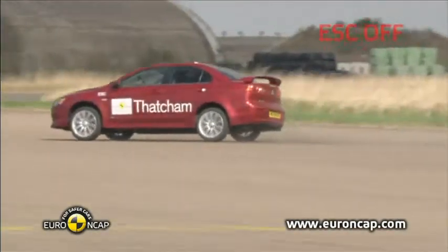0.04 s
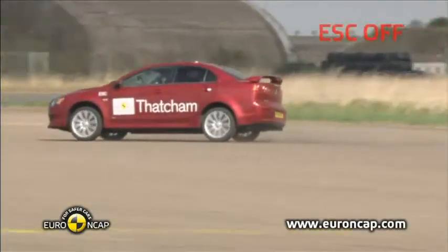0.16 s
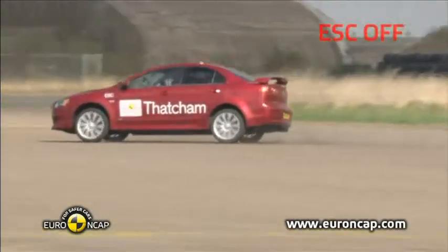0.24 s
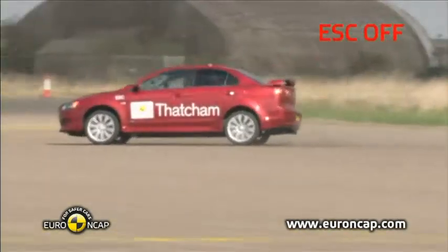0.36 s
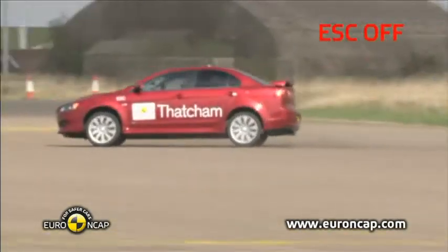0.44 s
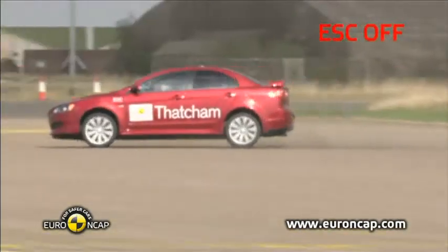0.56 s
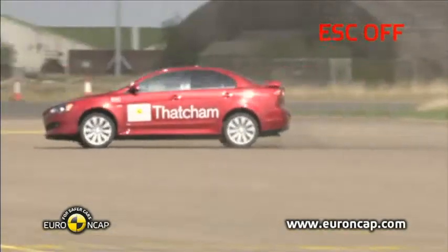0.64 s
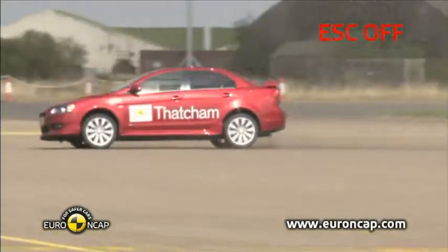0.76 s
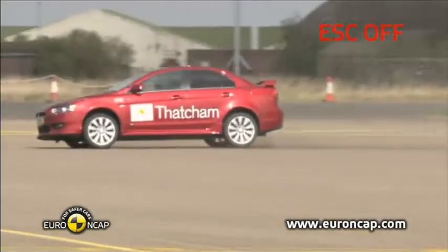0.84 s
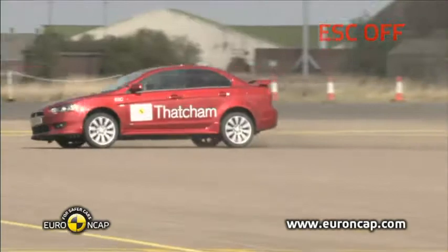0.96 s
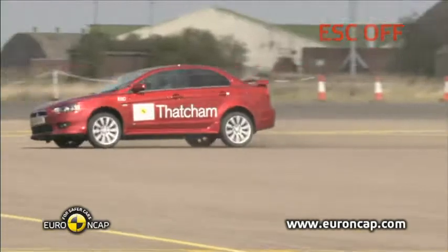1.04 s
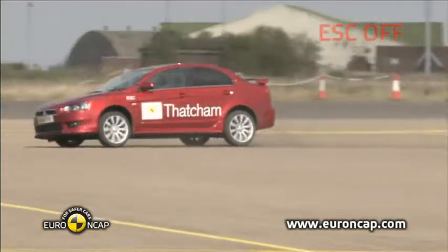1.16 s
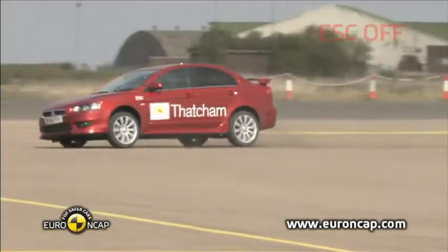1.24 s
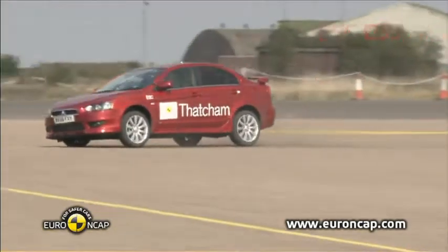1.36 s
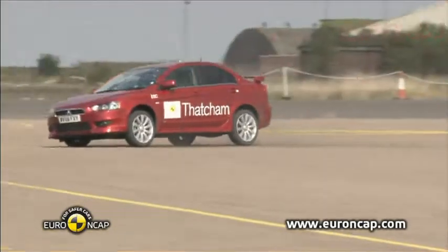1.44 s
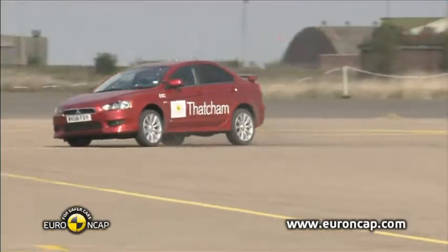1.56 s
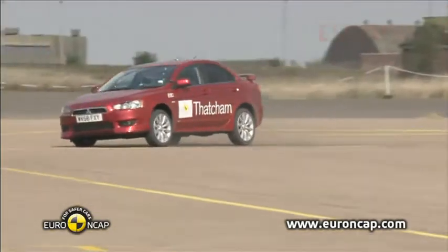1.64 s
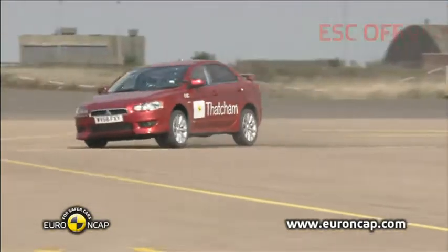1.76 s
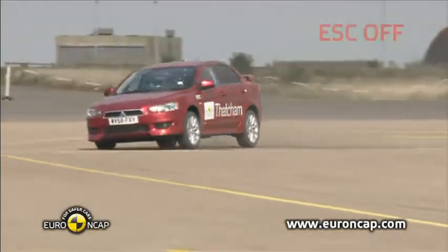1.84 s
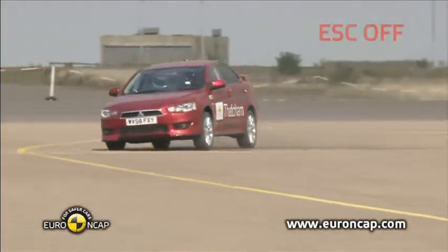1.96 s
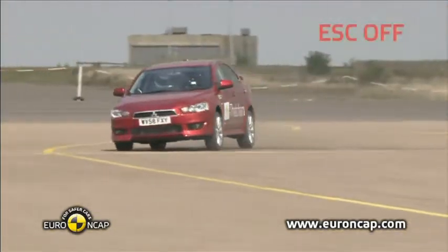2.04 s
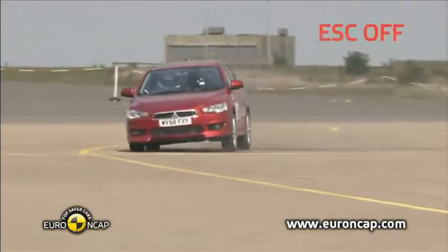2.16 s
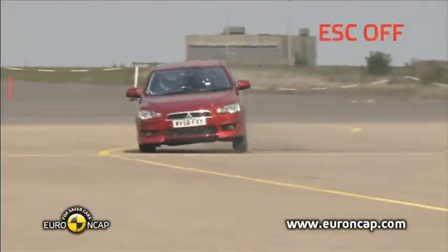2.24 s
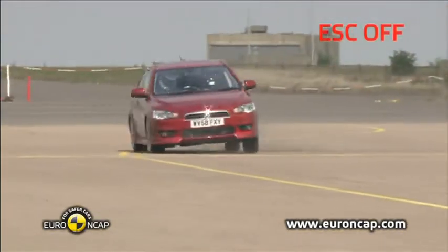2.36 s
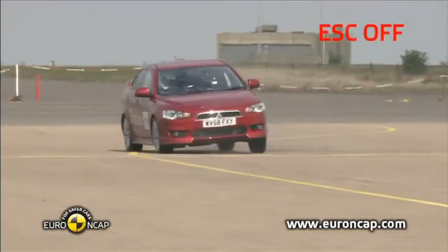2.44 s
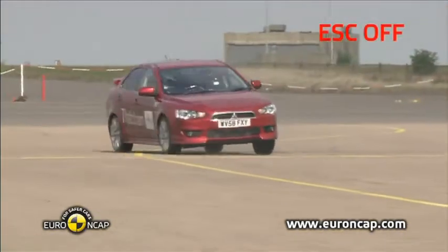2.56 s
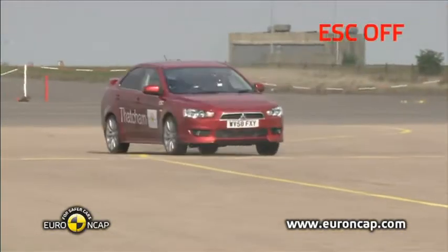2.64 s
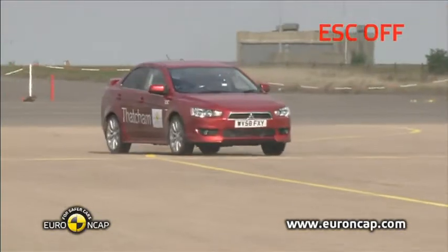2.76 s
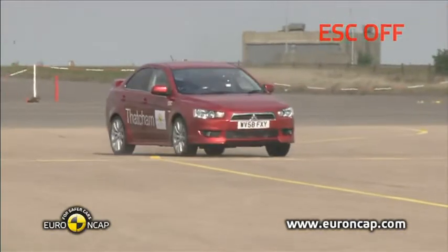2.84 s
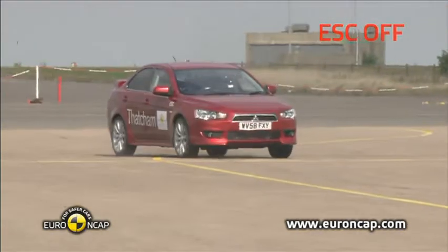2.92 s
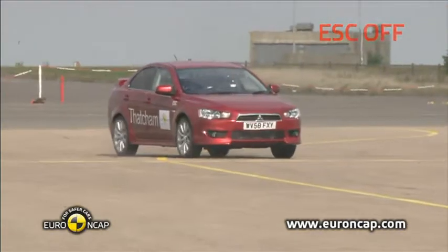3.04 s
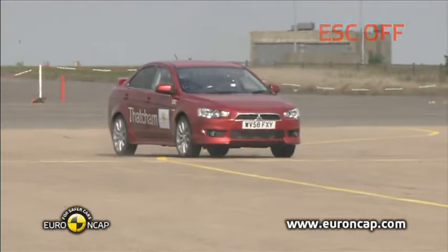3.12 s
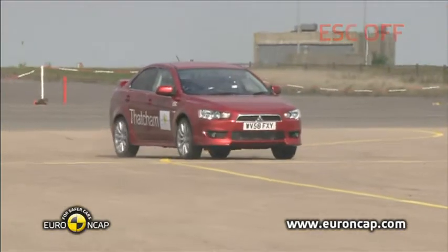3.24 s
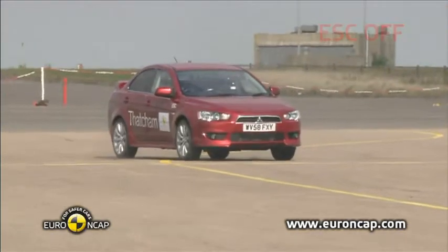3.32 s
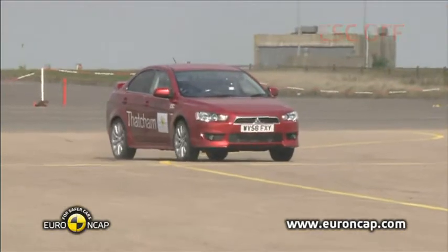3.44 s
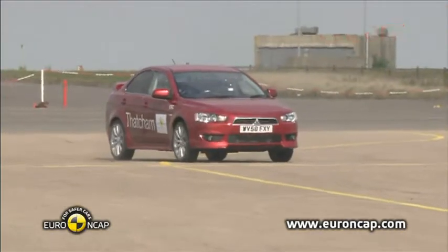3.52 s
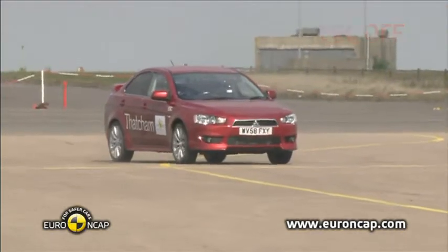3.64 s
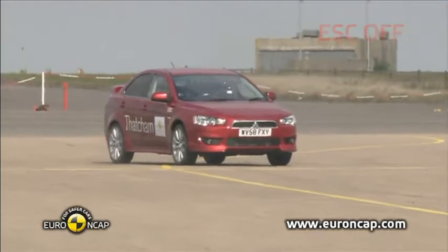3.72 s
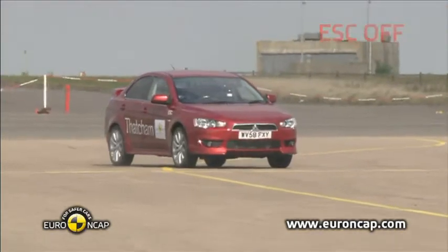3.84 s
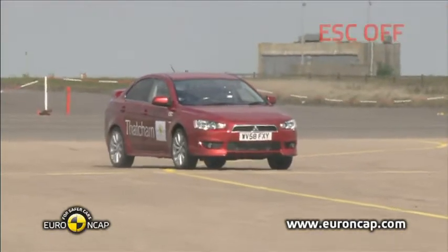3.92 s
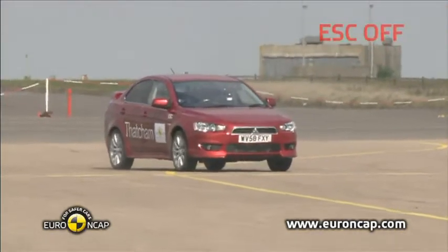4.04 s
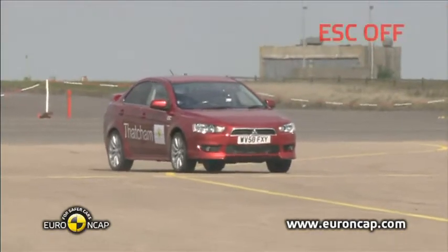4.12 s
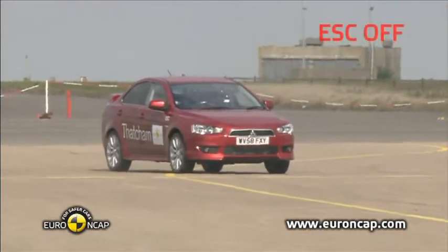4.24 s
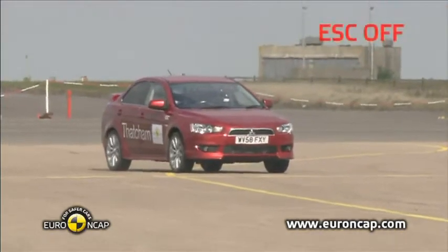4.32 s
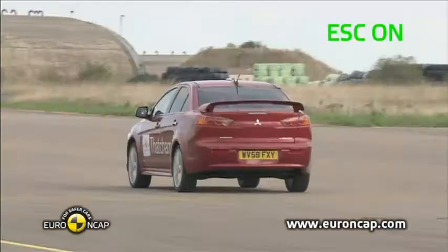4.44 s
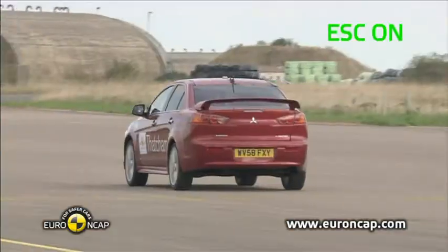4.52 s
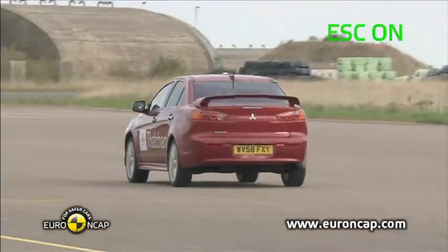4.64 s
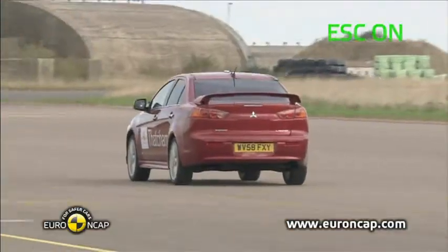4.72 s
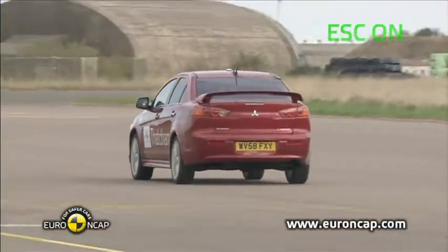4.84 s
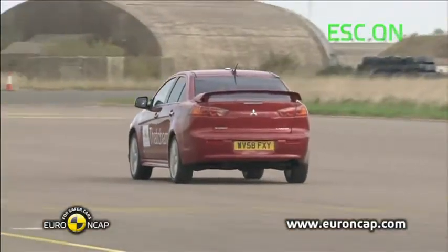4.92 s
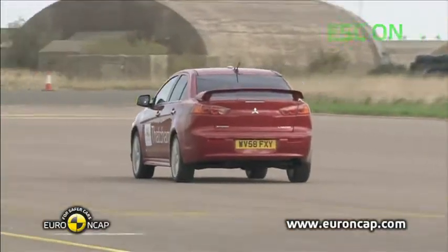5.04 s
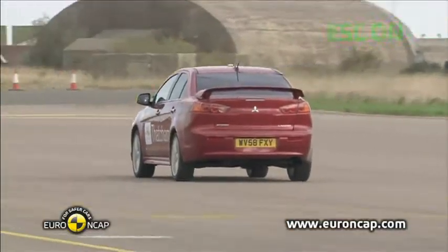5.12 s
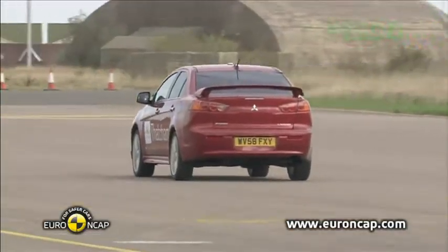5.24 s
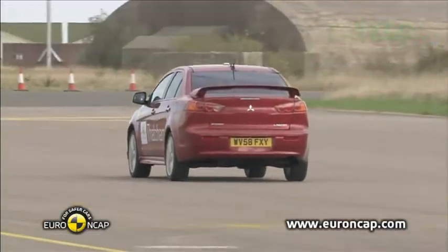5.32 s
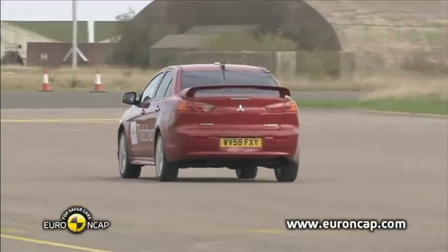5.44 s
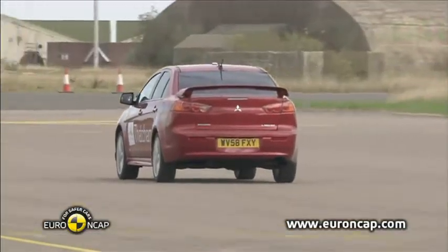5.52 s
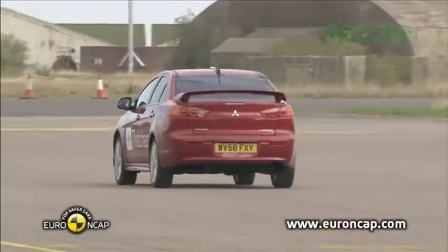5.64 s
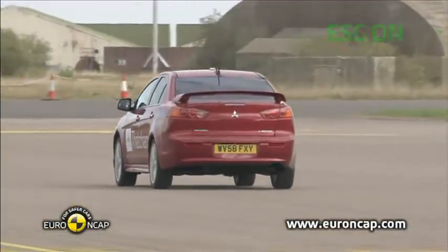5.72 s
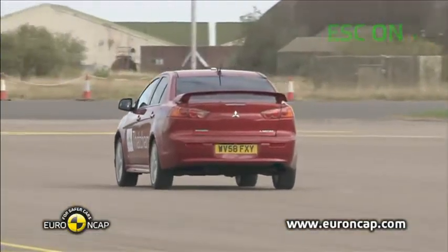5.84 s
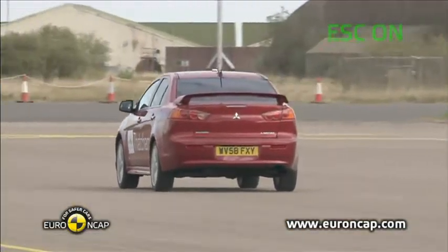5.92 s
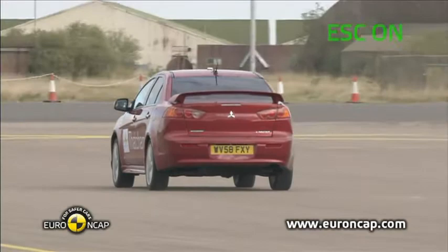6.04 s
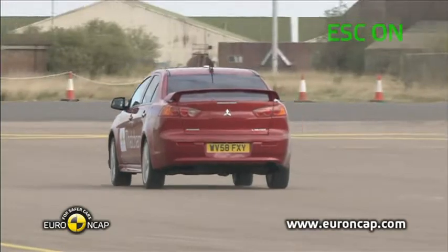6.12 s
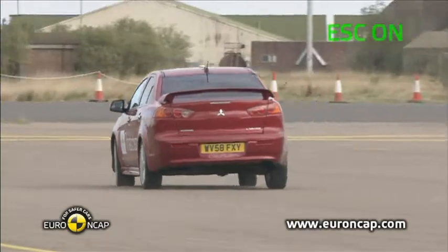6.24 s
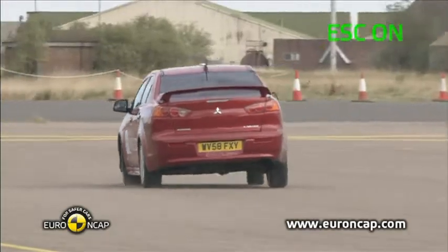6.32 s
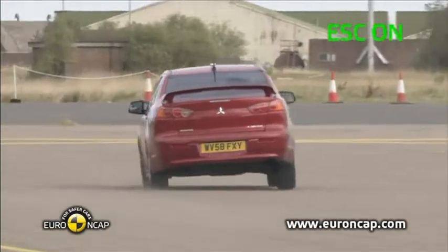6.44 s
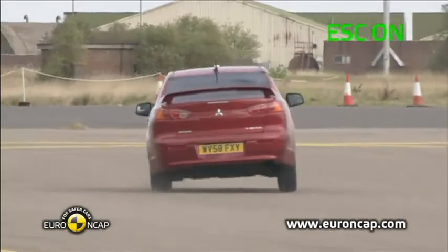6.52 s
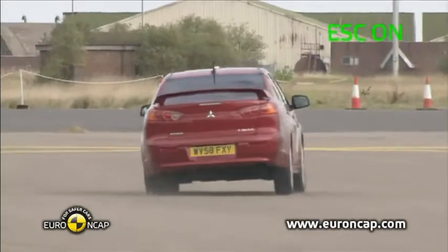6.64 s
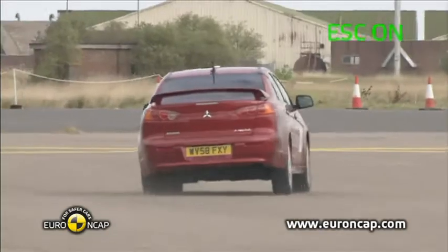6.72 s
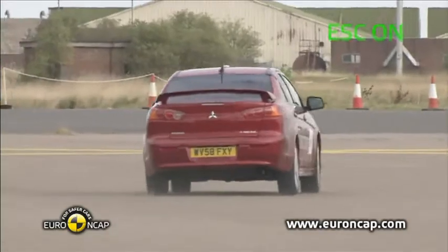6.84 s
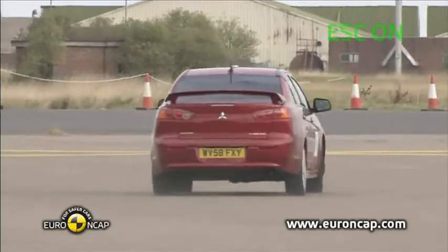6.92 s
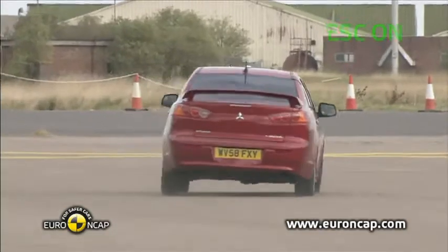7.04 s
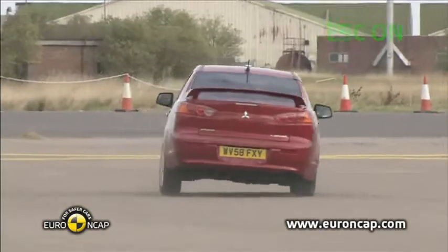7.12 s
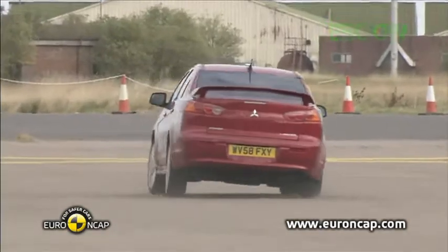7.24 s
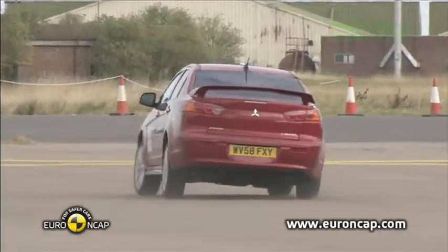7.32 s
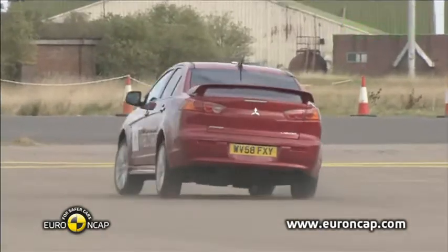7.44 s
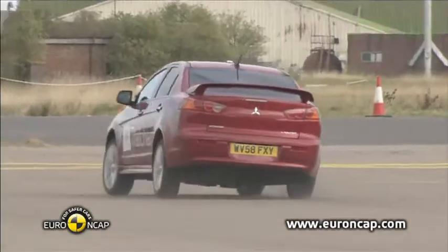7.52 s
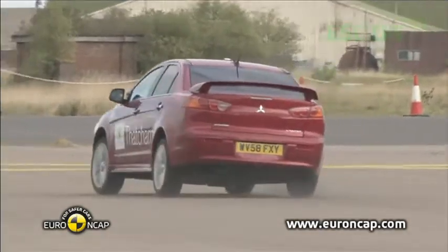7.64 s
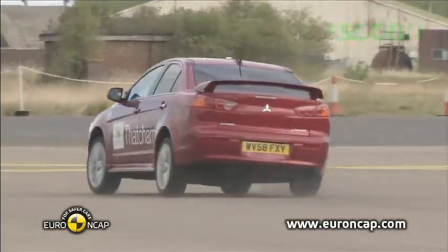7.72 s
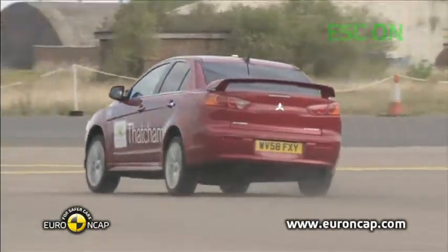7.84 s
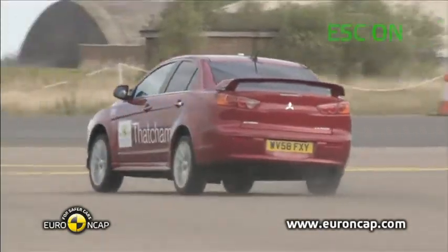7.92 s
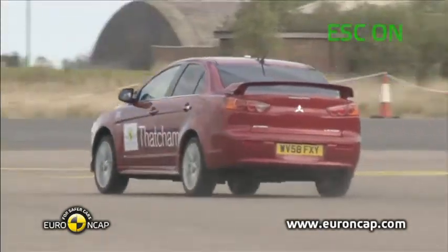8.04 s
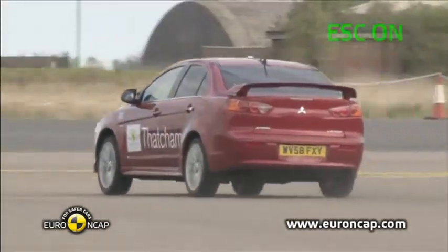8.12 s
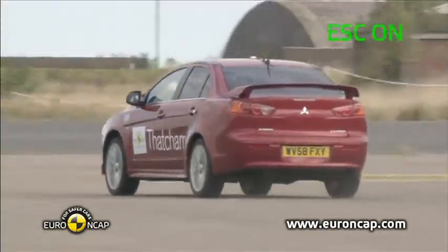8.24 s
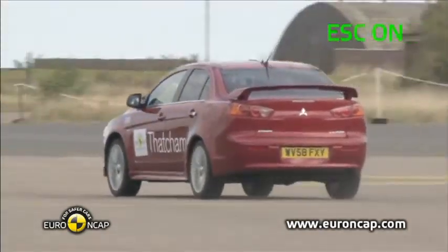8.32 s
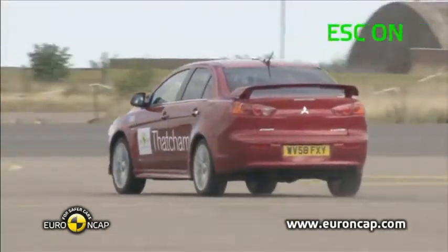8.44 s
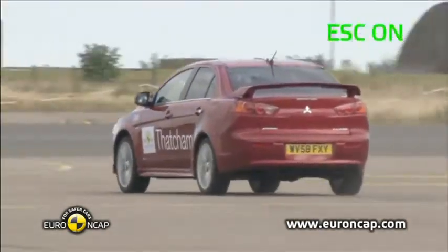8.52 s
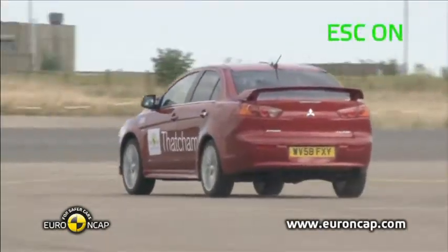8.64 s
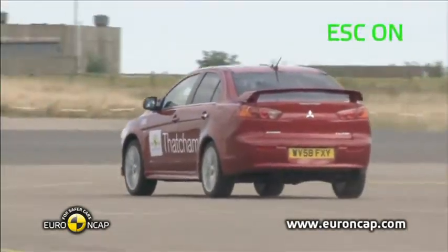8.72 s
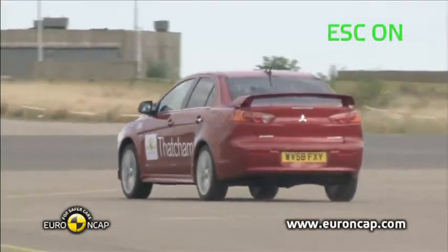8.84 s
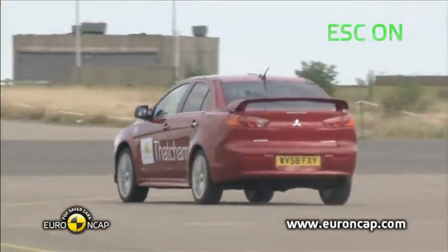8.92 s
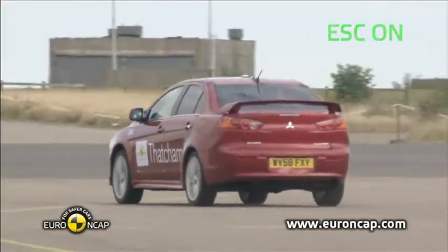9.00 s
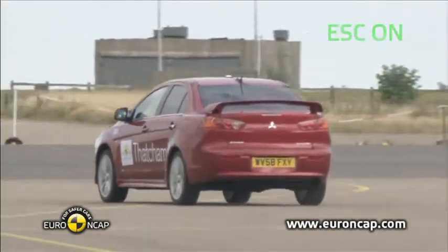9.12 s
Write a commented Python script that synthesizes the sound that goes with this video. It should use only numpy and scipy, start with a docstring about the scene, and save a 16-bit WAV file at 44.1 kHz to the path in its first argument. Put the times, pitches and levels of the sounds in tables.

```python
"""Tyres squeal as a car skids sideways to a stop on open asphalt. After an abrupt change of scene it
drives away, swerves, and one tyre squeals briefly. The squeal is a stick-slip oscillation of the tread;
scrubbing and rolling add a broad roar above the rumble of engine and body. Wind buffets the two ports
of the microphone, with a few small rustles nearby, over far traffic and a faint hiss."""
import sys
import numpy as np
from scipy import signal
from scipy.fft import rfft, irfft, next_fast_len
from scipy.io import wavfile

SR = 44100
rng = np.random.default_rng(int(sys.argv[2]) if len(sys.argv) > 2 else 0)


def transcribe(u):
    """Save the signal u as a 16-bit wav file named by the first command-line argument.

    u: samples, shape (n,) or (channels, n), limited to [-1, 1]; the rate is SR.
    q: integer samples, one column per channel.
    """
    v = np.clip(np.atleast_2d(u).T, -1, 1)
    q = np.round(v * 32767).astype(np.int16)
    wavfile.write(sys.argv[1], SR, q)


N = 404397


def squeal(rows, wander, flutter_db, skirt_db, third_db, skirt_hz=41.0, rougher_db=4.5):
    """Stick-slip oscillation: tread blocks slipping in step give four wavering harmonics, and those
    out of step give each a skirt of noise, rougher_db stronger from one harmonic to the next."""
    start, end = round(rows[0][0] * SR), round(rows[-1][0] * SR)
    size = end - start
    slip_hz, first_db, second_db = (column[start:end] for column in in_time(rows))
    upper_db = second_db + np.broadcast_to(third_db, N)[start:end]   # third_db is relative to the 2nd
    levels_db = first_db, second_db, upper_db, upper_db - 13.5
    t = np.arange(size) / SR
    gate = np.clip(np.minimum(t / .004, t[::-1] / .03), 0, 1)
    waver = 1 + wander * (drift(14, size) + .7 * drift(50, size))
    phase = 2 * np.pi * np.cumsum(slip_hz * waver) / SR
    partials = 0
    for k, level_db in enumerate(levels_db):
        width_hz = skirt_hz * (k + 1)
        skirt = from_db(skirt_db + rougher_db * k) * (drift(width_hz, size) + 1j * drift(width_hz, size))
        swing = np.minimum(drift(22, size), 1.1)   # dips deeper than it swells
        flutter = from_db(flutter_db * (1 + .15 * k) * swing)
        harmonic = np.real(np.exp(1j * (k + 1) * phase) * (1 + skirt))
        partials += from_db(level_db) * flutter * harmonic
    out = np.zeros(N)
    out[start:end] = np.sqrt(2) * gate * partials
    return out


def tyres():
    """Superposition: each sliding tyre oscillates at its own slip frequency, and the squeals add."""
    # Squeals. Each row: time in seconds, slip frequency in Hz, 1st and 2nd harmonic levels in dB.
    outer_front = [(0.0, 749, -22, -17), (0.2, 740.5, -21, -19), (0.42, 738, -17, -23),
                   (0.55, 720.9, -23, -32.5), (0.66, 743.8, -20, -29.5), (1.0, 732.8, -23, -35.5),
                   (1.32, 711, -35, -37.5), (1.62, 699, -18.5, -32.5), (1.86, 722.8, -31.5, -32),
                   (2.06, 702.2, -26, -39), (2.16, 759.7, -26, -30.5), (2.48, 779.3, -27, -28),
                   (2.62, 767, -39, -35), (2.74, 792, -30, -38), (2.875, 802, -28, -39.5),
                   (2.9, 902, -24.5, -39.5), (2.94, 886, -38, -41.5), (2.965, 820, -27, -39),
                   (3.04, 876, -29, -37), (3.12, 888, -33, -50.5), (3.18, 950, -49, -63)]
    outer_rear = [(0.15, 860.7, -34.5, -42), (0.5, 853.2, -33, -34.5), (0.7, 827.2, -29, -41.5),
                  (0.92, 855, -27, -35.5), (1.14, 844.8, -29, -41.5), (1.25, 822.4, -30, -35),
                  (1.55, 855.4, -23.5, -32.5), (1.76, 934, -28, -43), (1.86, 949, -43, -58),
                  (1.96, 954, -30, -50.5), (2.14, 850, -31.5, -35), (2.4, 929, -27, -44),
                  (2.52, 926, -31.5, -43.5), (2.76, 1035, -47, -58.5)]
    inner_front = [
        [(0.28, 773, -30.5, -28.5), (0.42, 817, -36.5, -26.5), (0.55, 778, -33.5, -19.5),
         (0.65, 801, -39.5, -25), (0.76, 790, -56, -56.5)],
        [(1.0, 757, -48, -57.5), (1.06, 738, -31, -38.5), (1.23, 750.5, -38.5, -31), (1.38, 727, -38.5, -34.5),
         (1.66, 745, -25.5, -31), (1.86, 730.5, -28.5, -41), (2.04, 749.7, -30.5, -25.5), (2.13, 762, -43, -24)],
    ]   # two slides, a table for each
    swerve = [(7.52, 727, -43, -63), (7.62, 712, -30.5, -44), (7.71, 735.7, -24.5, -44),
              (7.76, 702.2, -18, -41.5), (7.94, 704, -22.5, -39), (8.03, 723.5, -23.5, -33.5),
              (8.18, 737, -24.5, -48), (8.26, 795.5, -32.5, -51.5), (8.33, 770, -48.5, -50.5)]
    moan = [(6.66, 758, -56.5, -76), (6.76, 800, -49.5, -65), (6.88, 840, -54.5, -76),
            (7.1, 1079, -50, -88), (7.3, 952, -56.5, -83), (7.4, 830, -49, -72), (7.6, 880, -58, -69.5),
            (8.1, 940, -51.5, -55), (8.55, 864, -59, -78.5)]   # rough tone of tread on the edge of slipping
    linger = [(3.2, 772, -69, -96.5), (3.578, 765, -62, -86), (3.88, 782, -76, -96)]   # faint thin tone after the stop
    # Outer front tyre's 3rd harmonic. Each row: time in seconds, level against the 2nd in dB.
    front_third = [(0.0, -18), (0.3, -16.5), (0.55, -3), (0.95, -7.5), (1.1, -15.5), (1.4, -8.5), (1.6, -9),
                   (1.85, -26), (2.1, -20.5), (2.5, -9.5), (2.66, -16), (3.0, -22.5), (3.15, -24)]
    # The same ratio in dB for the outer rear, the two inner front slides, the swerve and the moan.
    other_thirds = [-19.5, -14, -21.5, -36, -12.5]
    rear_db, *inner_db, swerve_db, moan_db = other_thirds
    front_db = in_time(front_third)[0]
    out = squeal(outer_front, wander=.005, flutter_db=2.5, skirt_db=-16, third_db=front_db)
    out += squeal(outer_rear, wander=.011, flutter_db=4.2, skirt_db=-14, third_db=rear_db, rougher_db=7)
    for slide, slide_db in zip(inner_front, inner_db):
        out += squeal(slide, wander=.007, flutter_db=3.8, skirt_db=-13, third_db=slide_db)
    out += squeal(swerve, wander=.006, flutter_db=2.8, skirt_db=-13, third_db=swerve_db,
                  skirt_hz=90, rougher_db=17)
    out += squeal(moan, wander=.01, flutter_db=1.5, skirt_db=10, third_db=moan_db,
                  skirt_hz=130, rougher_db=0)
    return out + squeal(linger, wander=.004, flutter_db=3, skirt_db=-10, third_db=-20)


def road(change_s=4.46):
    """Random excitation: tread scrubs and rolls on rough asphalt, while engine and body rumble below."""
    # Skid and drive-away. Each row: time in seconds, then roar, treble and rumble levels in dB.
    skid = [(0.03, -36.5, -51, -48), (0.55, -36.5, -47.5, -51.5), (1.09, -37.5, -59, -49.5),
            (1.42, -37.5, -50.5, -52.5), (1.65, -33, -50, -48.5), (1.93, -36, -59, -51),
            (2.24, -38, -50, -54.5), (2.55, -43, -53, -56), (2.96, -50, -71, -60.5),
            (3.22, -69, -89, -64.5), (3.75, -79.5, -83, -86)]
    drive = [(4.55, -39.5, -56.5, -42), (4.75, -39.5, -58.5, -46), (5.96, -42, -64, -45.5),
             (6.35, -46, -68, -48), (6.55, -43.5, -63, -47.5), (6.8, -40.5, -60, -46),
             (7.0, -39.5, -63, -47.5), (7.16, -38, -55, -46), (7.37, -40.5, -64, -43.5),
             (7.56, -34, -52.5, -44.5), (8.13, -29, -46, -45.5), (8.31, -39.5, -53, -46.5),
             (8.45, -46, -63.5, -50), (8.66, -52.5, -77, -50), (9.0, -50.5, -72, -54.5),
             (9.17, -53.5, -71.5, -48)]
    # Spectra of the tread and the rumble. Each row: frequency in Hz, relative density in dB.
    skid_spectrum = [(300, -36), (500, -20.5), (700, -6.5), (870, -0.5), (1180, -8.5), (1500, -4.5),
                     (1900, -12), (2600, -24.5), (3400, -32.5), (4500, -47.5)]
    drive_spectrum = [(260, -31), (450, -9), (724, 0), (855, 4), (1160, 1), (1300, 1), (1750, -5.5),
                      (1970, -6.5), (2230, -11.5), (3300, -27), (4290, -55.5), (7260, -120)]
    treble_spectrum = [(2000, -5), (3000, 0), (3600, -2.5), (4500, -9), (5500, -16.5), (6300, -19.5),
                       (7200, -32), (8500, -34), (11000, -46)]
    rumble_spectrum = [(59, -40), (100, -6.5), (199, 0.5), (329, -3), (431, -1.5), (524, -7), (600, -3),
                       (780, -32.5), (1320, -120)]
    away = np.clip((np.arange(N) / SR - change_s) / .002, 0, 1)   # 0 in the first scene, 1 in the second
    roar_db, treble_db, rumble_db = away * in_time(drive) + (1 - away) * in_time(skid)
    roar = away * coloured(drive_spectrum, 966, 1426) + (1 - away) * coloured(skid_spectrum, 983, 1350)
    grit = from_db(0.47 * drift(10) + 0.77 * drift(55))   # uneven asphalt
    treble = from_db(treble_db + 0.72 * drift(14)) * coloured(treble_spectrum, 2800, 7100)
    rumble = from_db(rumble_db + 1.8 * drift(8)) * coloured(rumble_spectrum, 120, 650)
    return grit * (from_db(roar_db) * roar + treble) + rumble


def wind(opposed_share=.62, buffet_ramp_s=.045):
    """Turbulent pressure: part of it pushes one port while pulling the other, the rest is independent."""
    # Slow course of the wind. Each row: time in seconds, level in dB.
    course = [(0.0, -54.5), (0.27, -61), (0.45, -44.5), (1.4, -41.5), (1.55, -48), (1.9, -46.5),
              (2.35, -52.5), (2.7, -49), (3.3, -43.5), (5.6, -50), (6.15, -45.5), (6.6, -42), (7.25, -51.5),
              (8.3, -52), (9.17, -45.5)]
    # Buffets. Each row: time of the peak in seconds, rise above the slow course in dB.
    buffets = [(1.43, 5.6), (2.82, 8.5), (2.96, 15), (3.109, 6.4), (7.34, 6.8), (9.07, 7.3)]
    # Pressure spectrum. Each row: frequency in Hz, relative density in dB.
    spectrum = [(2, -12), (5, -1), (15, 1), (38, -1), (75, -5), (119, -13), (300, -24), (500, -36),
                (900, -70)]
    exposure_db = [[0], [5]]   # the right port is more exposed
    common, *own = (coloured(spectrum, 10, 90) for _ in range(3))
    pressure = np.sqrt(opposed_share) * common * [[1], [-1]] + np.sqrt(1 - opposed_share) * np.array(own)
    t = np.arange(N) / SR
    buffets_db = sum(db * np.clip(1 - abs(t - peak_s) / buffet_ramp_s, 0, 1) for peak_s, db in buffets)
    return from_db(in_time(course)[0] + buffets_db + exposure_db + 1.8 * drift(4.5)) * pressure


def rustle(resonance_hz=3230, body_hz=547, t60_s=0.096):
    """Noise-driven resonance: soft decaying puffs in a main band, its weaker octave and a dull body."""
    # Rustles near the microphone. Each row: start in seconds, relative level in dB.
    puffs = [(3.8536, -75), (3.874, -61), (3.891, -57), (3.905, -54.5), (3.9294, -59), (3.9524, -64),
             (3.99, -69), (4.324, -68), (4.3494, -67)]
    bands = [signal.butter(2, [hz * 0.7, hz * 1.15], "band", fs=SR, output="sos")
             for hz in (resonance_hz, 2 * resonance_hz, body_hz)]
    out, t = np.zeros(N), np.arange(4000) / SR
    for start_s, level_db in puffs:
        noise = rng.standard_normal(len(t))
        main, octave, body = (rms_one(signal.sosfilt(band, noise)) for band in bands)
        envelope = from_db(level_db - 60 * t / t60_s) * np.minimum(t / 0.0055, 1)
        out[round(start_s * SR):][:len(t)] += envelope * (main + 0.66 * octave + 1.9 * body)
    return out * from_db([[-3], [1.5]])   # louder on the right


def air():
    """Partial coherence: far traffic and hiss reach the ports partly in phase, partly in antiphase."""
    # Background spectra. Each row: frequency in Hz, in-phase and antiphase densities in dB.
    spectra = [(100, -54, -40), (201, -45.5, -46), (450, -48, -48.5), (1000, -51.5, -46.5),
               (1400, -64, -54), (2500, -71.5, -59), (4500, -72, -67), (7060, -72, -69), (8500, -70.5, -73),
               (12000, -72, -83), (13500, -74.5, -78.5), (15000, -87, -96.5)]
    in_phase = coloured(np.array(spectra)[:, :2])
    antiphase = coloured(np.array(spectra)[:, ::2])
    return in_phase + antiphase * [[1], [-1]]


def ports(sound):
    """Level and phase differences: each port takes half of them, in opposite senses."""
    # Level difference. Each row: frequency in Hz, left minus right in dB.
    level_difference = [(60, 3.5), (350, 1), (800, 3), (1000, 3.5), (1200, -5), (1400, -5), (1650, -0.5),
                        (2040, 2), (3200, 3.5), (9000, -2.5)]
    # Phase difference. Each row: frequency in Hz, lead of the left port in radians.
    phase_difference = [(0, 0), (780, .2), (1030, -.8), (1250, -.3), (1550, .6), (1810, 0), (2150, .6),
                        (2500, 0), (3010, .1), (3360, -.1)]
    size = next_fast_len(N)
    hz = np.arange(size // 2 + 1) * SR / size
    nepers = np.log(10) / 20 * np.interp(hz, *np.transpose(level_difference))
    lead = np.interp(hz, *np.transpose(phase_difference))
    half = (nepers + 1j * lead) / 2
    return irfft(rfft(sound, size) * np.exp([half, -half]), size)[:, :N]


def coloured(spectrum, low_hz=None, high_hz=None):
    """Spectral shaping of white noise; the band between the two edges, when given, has rms 1."""
    size = next_fast_len(N)
    hz = np.arange(size // 2 + 1) * SR / size + 1e-3
    knot_hz, knot_db = np.transpose(spectrum)
    inside = (hz > knot_hz[0]) & (hz < knot_hz[-1])
    shape = from_db(np.interp(np.log(hz), np.log(knot_hz), knot_db)) * inside
    noise = irfft(rfft(rng.standard_normal(size)) * shape, size)[:N]
    if low_hz is None:
        return noise
    band_power = 2 * np.sum(shape[(hz > low_hz) & (hz < high_hz)] ** 2) / size
    return noise / np.sqrt(band_power)


def drift(rate_hz, size=N):
    """Slow random fluctuation of rms 1: noise at every 8th sample, twice through a one-pole low-pass."""
    pole = np.exp(-16 * np.pi * rate_hz / SR)
    noise = rng.standard_normal(size // 8 + 4002)
    slow = signal.lfilter([1], [1, -2 * pole, pole * pole], noise)[4000:]   # once the filter has settled
    return np.interp(np.arange(size) / 8, np.arange(len(slow)), rms_one(slow))


def in_time(rows):
    """Linear interpolation, at every sample, of each column after the time."""
    times_s, *columns = np.transpose(rows)
    return [np.interp(np.arange(N) / SR, times_s, column) for column in columns]


def from_db(db):
    """Amplitude ratio of a level in decibels."""
    return 10 ** (np.asarray(db) / 20)


def rms_one(x):
    """Normalisation to rms 1."""
    return x / np.sqrt(np.mean(x ** 2) + 1e-20)


def scene():
    """Superposition at the ports: the car's direct sound, scattered road noise, wind, air and rustles."""
    car = tyres() + road()
    scattered = from_db(-14.5) * road() * [[1], [-1]]   # arrives from the sides
    return ports(car) + scattered + wind() + air() + rustle()


def record(dry, stopband_hz=15000):
    """Band limiting: a steep low-pass removes the highest treble."""
    return signal.sosfilt(signal.cheby2(12, 60, stopband_hz, fs=SR, output="sos"), dry)


dry = scene()
out = record(dry)
transcribe(out)
```